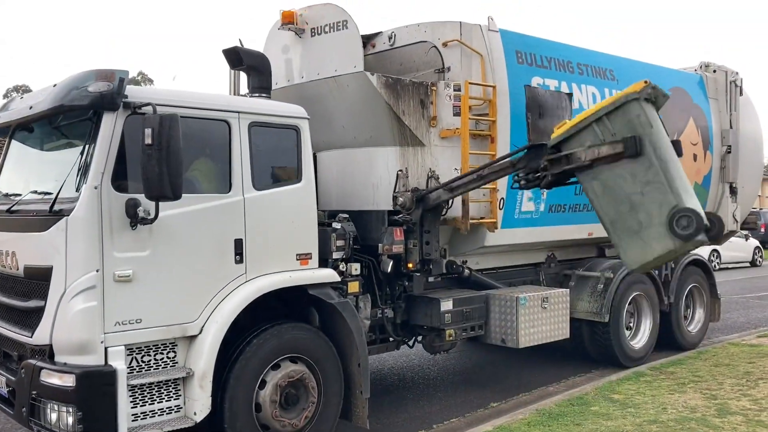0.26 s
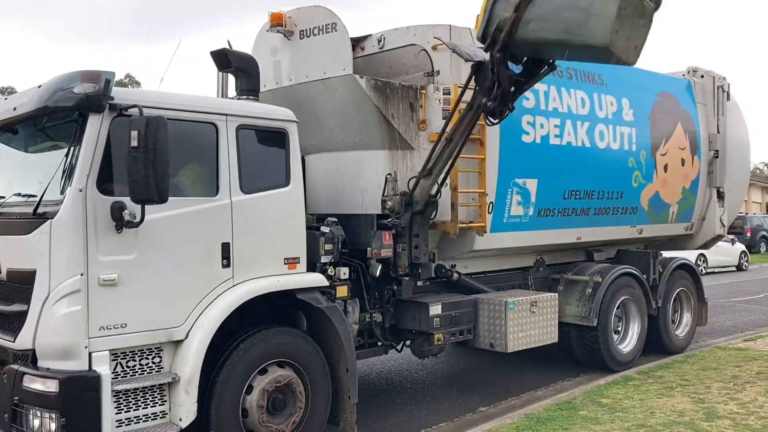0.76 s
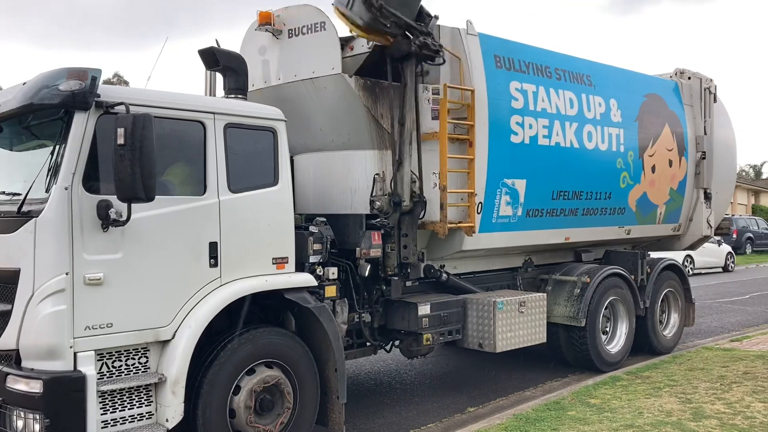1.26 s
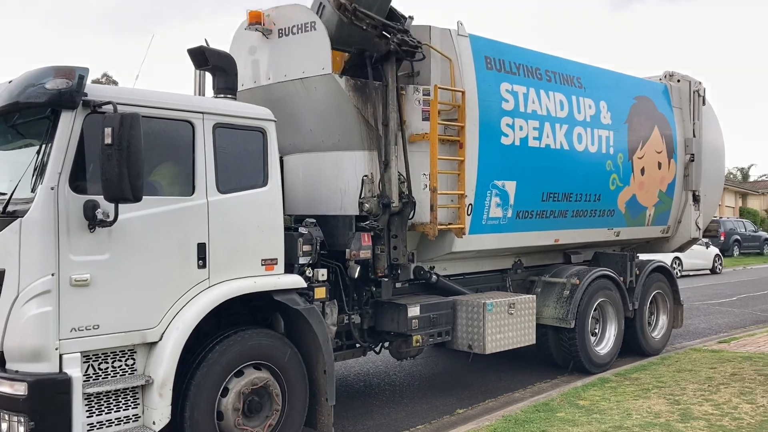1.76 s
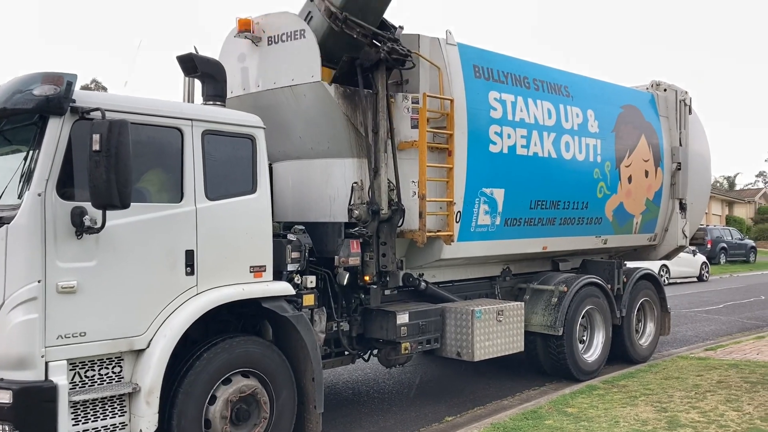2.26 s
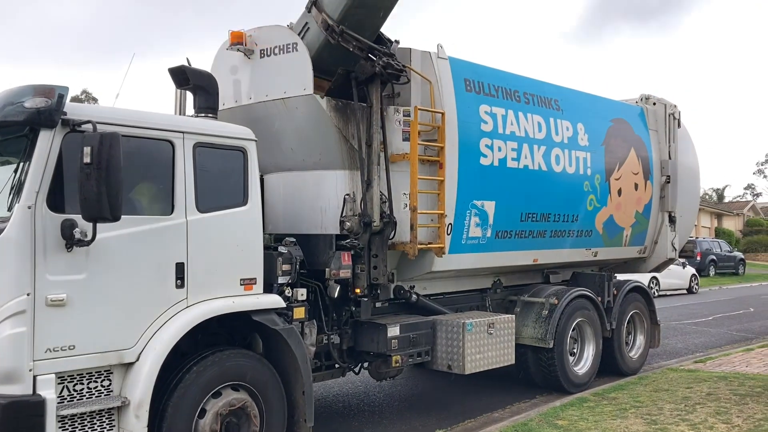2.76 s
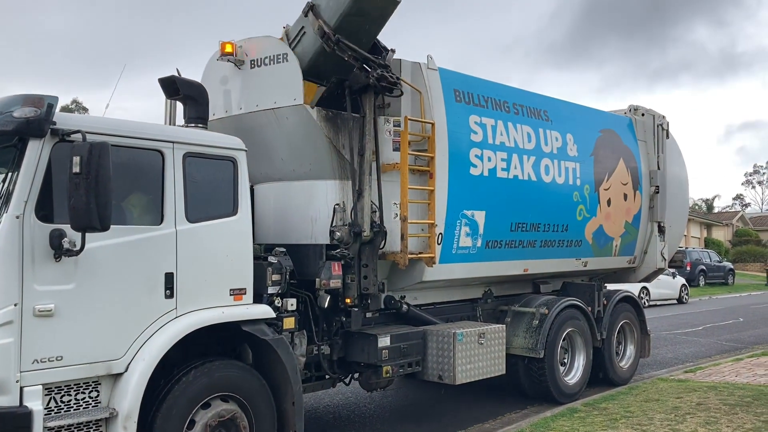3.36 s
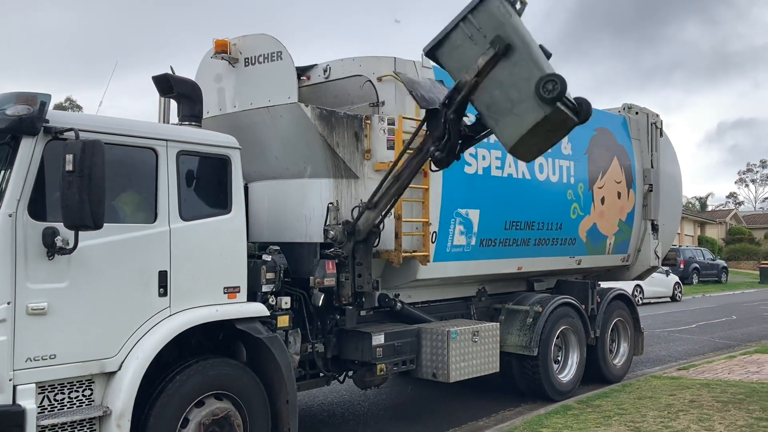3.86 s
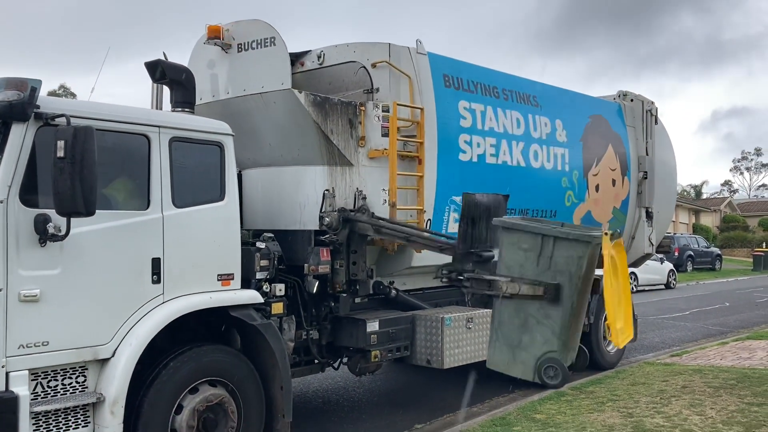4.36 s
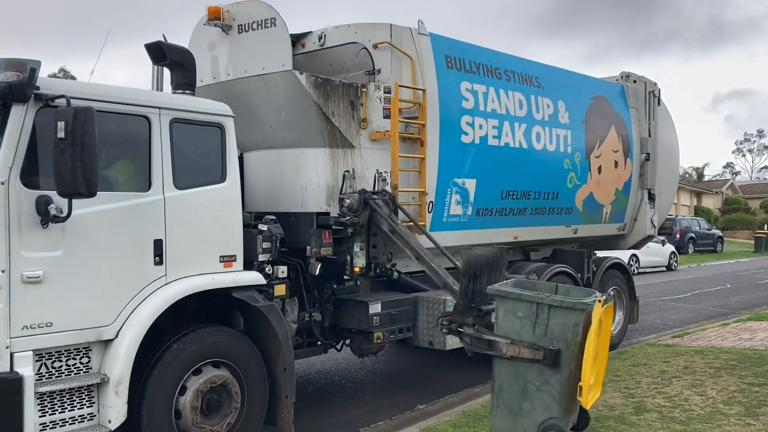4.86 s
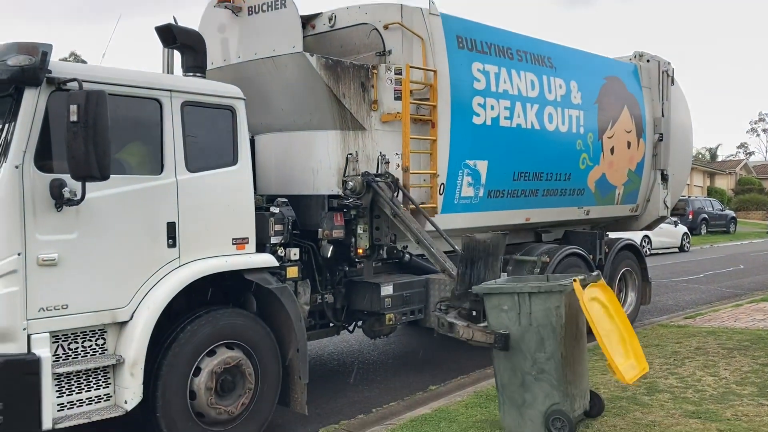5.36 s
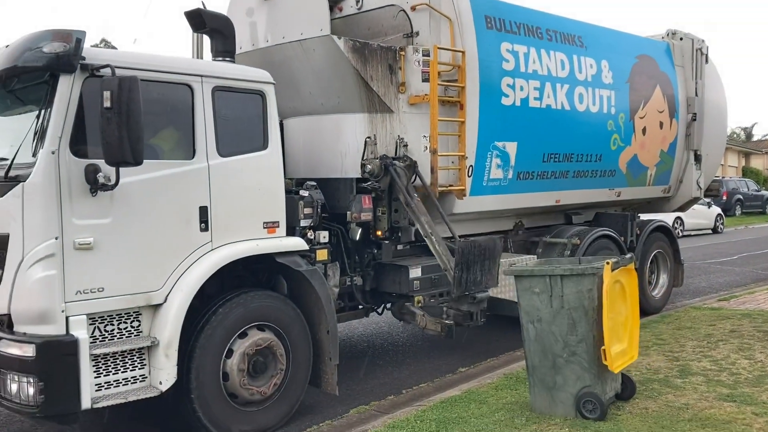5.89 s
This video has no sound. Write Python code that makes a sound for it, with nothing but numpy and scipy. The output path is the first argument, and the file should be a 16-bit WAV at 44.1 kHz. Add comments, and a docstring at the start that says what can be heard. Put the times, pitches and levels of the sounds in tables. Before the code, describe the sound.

A diesel garbage truck idles and whines as its arm tips a bin, rubbish clattering into the hopper before the bin thuds down.

```python
"""Refuse truck at the kerb

A six-cylinder diesel runs at fast idle, driving a hydraulic pump that hums and whines. The side arm
lifts a plastic bin; rubbish tumbles into the steel hopper, ringing its plates, and bottles clink. The
arm sets the bin down and folds against its stops, and the brakes vent a jet of air.
Heard from the street, a few metres off, on a hand-held phone with two microphone ports."""
import sys
import numpy as np
from scipy import signal
from scipy.fft import rfft, irfft, next_fast_len
from scipy.io import wavfile
from scipy.ndimage import uniform_filter1d

SR = 44100
rng = np.random.default_rng(int(sys.argv[2]) if len(sys.argv) > 2 else 0)


def bounce(signal):
    """Save signal as a 16-bit WAV file at the path given by the first command-line argument."""
    frames = np.transpose(np.atleast_2d(signal))
    limited = np.clip(frames, -1, 1)
    pcm = np.round(limited * 32767).astype(np.int16)
    wavfile.write(sys.argv[1], SR, pcm)


N = 270333

# modes of the steel hopper: f/Hz, level/dB, t60/s
HOPPER_MODES = [(237, 0, .15), (340, -4, .15), (650, -2, .06), (720, -3, .05), (1080, -4, .05),
                (1250, -6, .04), (1550, -5, .04), (1850, -5, .04), (2200, -8, .05), (2720, -5, .05),
                (2950, -7, .04), (3150, -6, .04), (3450, -6, .04), (3880, -8, .05), (4350, -8, .04)]
BLUNT_DB_PER_OCT, SHARP_DB_PER_OCT = 5.3, 90  # how closely a blow keeps to its pitch


def undb(db):
    """Decibels to amplitude."""
    return 10 ** (np.asarray(db) / 20)


def unit(x):
    """Scale to rms 1."""
    return x / np.sqrt(np.mean(x ** 2))


def curves(table):
    """Columns of a table joined by straight lines in time."""
    s, *columns = np.transpose(table)
    return [np.interp(np.arange(N) / SR, s, c) for c in columns]


def swell(start_s, rise_s, length_s, t60):
    """Rise, hold until length_s, then die away."""
    t = np.arange(N) / SR - start_s
    return np.clip(t / rise_s, 0, 1) * undb(-60 * np.maximum(t - length_s, 0) / t60)


def colour(x, points):
    """Filter x through (f/Hz, gain/dB) points, steeply closed beyond the ends; rms 1."""
    hz, db = np.transpose(points)
    size = next_fast_len(N)
    f = np.maximum(np.fft.rfftfreq(size, 1 / SR), 1)
    skirt_db = -24 * (np.maximum(np.log2(hz[0] / f), 0) + np.maximum(np.log2(f / hz[-1]), 0))
    gain = undb(np.interp(np.log(f), np.log(hz), db) + skirt_db)
    return unit(irfft(rfft(x, size) * gain, size)[:N])


def ring(x, hz, t60):
    """One decaying mode driven by x."""
    r, w = np.exp(-np.log(1000) / (max(t60, .005) * SR)), 2 * np.pi * hz / SR
    return signal.lfilter([0, np.sin(w)], [1, -2 * r * np.cos(w), r * r], x)


def walk(rate):
    """Random levels held 1 / rate s and slewed twice; spread near 1."""
    k = int(SR / rate)
    steps = np.repeat(rng.standard_normal(N // k + 1), k)
    return 1.3 * uniform_filter1d(uniform_filter1d(steps, k), k)[:N]


def grains(per_s, spread_db):
    """Random clicks of very unequal size."""
    hits = rng.random(N) < per_s / SR
    return hits * rng.standard_normal(N) * undb(spread_db * rng.exponential(size=N))


def tones(cycles, partials, waver_db):
    """Sines (multiple, level/dB) locked to a cycle count, wavering in level and a little in phase."""
    return sum(np.sqrt(2) * undb(db + waver_db * walk(9))
               * np.sin(2 * np.pi * k * cycles + 0.37 * np.sqrt(k) * walk(12) + k) for k, db in partials)


def blows(events, modes, rattle_s, detune, focus_db, crack_db):
    """Each blow is a short rattle that cracks and rings the modes near its pitch, never twice alike."""
    out, t = np.zeros(N + SR), np.arange(SR // 4) / SR
    for s, db, centre_hz in events:
        push = rng.standard_normal(len(t)) * np.minimum(t / (.1 * rattle_s), 1)
        push *= np.exp(-(t / rattle_s) ** 2)
        # steel walls and road throw the crack back
        tail = np.minimum(t / rattle_s, 1) * undb(-14 - 60 * t / .3) * rng.standard_normal(len(t))
        chance = rng.standard_normal((len(modes), 2)) * [3, detune]
        body = sum(undb(mode_db + chance_db - focus_db * abs(np.log2(hz / centre_hz)))
                   * ring(push, hz * (1 + shift), t60)
                   for (hz, mode_db, t60), (chance_db, shift) in zip(modes, chance))
        band = signal.butter(2, [0.46 * centre_hz, min(2.2 * centre_hz, 15500)], "band", fs=SR)
        crack = undb(crack_db) * signal.lfilter(*band, push + tail)
        out[int(s * SR):][:len(t)] += undb(db) * (1.06 * body / np.abs(body).max() + crack)
    return out[:N]


def exhaust_and_fan(firings, bass_db):
    """The exhaust's firing note and overtones, with the fan droning near three times the firing rate."""
    orders = [2, 4, 5, 6]  # exhaust overtones: multiple of the firing rate
    orders_db = [-21, -13.5, -20, -8.5]  # their level/dB re the fan
    firing_note = undb(-2.5 + bass_db) * tones(firings, [(0.99, 0)], waver_db=0.39)
    fan = tones(firings, [(2.966, 0)], waver_db=0.99)
    overtones = tones(firings, zip(orders, orders_db), waver_db=1.3)
    return firing_note + undb(0.72 * bass_db) * (fan + overtones)


def hydraulic_pump(firings, tick):
    """The engine-driven pump hums and whines louder under pressure, at each stroke of the arm."""
    # strokes: t/s, length/s, then level/dB re engine of hum, octave, third harmonic, whine
    strokes = [(-.1, 0.43, -19, -7, -21, -9), (.32, 0.92, -10.5, -14, -17.5, -8),
               (2.1, 0.64, -4, -21, -23, -10), (2.75, 0.71, -17, -15, -17.5, -9.5),
               (3.65, 1, -4, -35, -26, -17), (4.7, 0.64, -2, -16, -39, -14),
               (5.4, 0.52, -4, -32, -36, -12.5), (5.8, .4, -8.5, -27, -39, -18)]
    rest_db, pump_order = -26.5, 3.378  # pump cycles per firing
    hum, octave, third, whine = undb(rest_db) + sum(
        undb(db)[:, None] * swell(s, 0.11, length_s, t60=0.62) for s, length_s, *db in strokes)
    cycles = pump_order * firings
    pump = hum * tones(cycles, [(1, 0), (4, -17)], waver_db=1.3)
    pump += octave * tones(firings, [(2 * pump_order, 0)], waver_db=0.89)
    pump += third * tones(firings, [(3 * pump_order, 0)], waver_db=4.0)
    # hydraulic whine, thin whine of the pump drive and a ping all throb with the crankshaft
    for hz, gain, throb_db in ((1097, whine, 4), (2163, undb(-16.5), 12), (3898, undb(-19), 16)):
        throb = unit(undb(throb_db * tick + 2.5 * walk(9)))
        phase = 2 * np.pi * hz * np.cumsum(1 + .0035 * walk(15)) / SR
        pump += gain * throb * np.sqrt(2) * np.sin(phase)
    return pump


def engine_roar(firings, tick, bass_db):
    """Broad noise, rumbling below; its treble is the clatter of the block, nudged by every firing."""
    spectrum = [(40, -30), (70, -0.5), (110, -5.5), (200, -3.5), (350, -7.5), (500, -17.5), (570, -48),
                (850, -10.5), (1400, -11.5), (1800, -12.5), (3300, -16.5), (5500, -22.5), (9200, -27),
                (12000, -25), (16000, -36)]  # roar: f/Hz, density/dB
    block_modes = [(1000, 500, -10, 2), (2550, 250, -16, 10), (6900, 500, -21, 5), (660, 60, -14, 1),
                   (1060, 160, -8, 3), (2162, 45, -14, 7), (4300, 300, -17.5, 10), (4850, 200, -23, 10)]  # engine block: f/Hz, width/Hz, level/dB re roar, swell on the tick/dB
    nudge = undb(.8 * np.cos(2 * np.pi * firings) + 1.2 * walk(12))
    noise = colour(rng.standard_normal(N), spectrum)
    rumble, low = (signal.sosfiltfilt(signal.butter(2, edge_hz, fs=SR, output="sos"), noise)
                   for edge_hz in (130, 1800))
    middle = (low - rumble) * undb(1.03 * walk(12))
    clatter = (noise - low) * unit(undb(3.5 * tick)) * nudge
    roar = undb(3 + bass_db) * rumble + middle + clatter
    for hz, width_hz, db, swell_db in block_modes:
        drive = rng.standard_normal(N) * undb(swell_db * tick) * nudge
        roar += undb(db) * unit(ring(drive, hz, t60=np.log(1000) / np.pi / width_hz))
    return roar


def diesel():
    """Exhaust, fan, pump and block keep time with one crankshaft, three firings to the turn."""
    # the engine's sound drops back after the rubbish crashes down, and its bass returns slowly: t/s, level/dB,
    # bass/dB re level
    loudness = [(0, -25, 1.5), (.3, -22.5, -2.5), (1.4, -22.5, 0), (1.6, -26.5, -2.5), (1.75, -24, -7),
                (1.9, -30, -22), (2.3, -30, -10), (2.7, -34.5, -0.5), (3.2, -32, 1), (3.6, -31, -1.5),
                (4.2, -31, 1), (5.0, -31.5, 1), (5.6, -30.5, 0.5), (6.13, -28, -3)]
    firing_rate = [(0, 45.6), (.45, 46.4), (.75, 46.9), (1.35, 47.55), (1.8, 47.7), (2.55, 47.2),
                   (3.15, 46.95), (3.5, 46.2), (3.63, 48.35), (4.05, 47.85), (4.95, 47.4), (5.1, 48),
                   (5.5, 47.45), (6.13, 47.6)]  # fast idle: t/s, f/Hz
    level_db, bass_db = curves(loudness)
    firings = np.cumsum(curves(firing_rate)[0]) / SR
    # one knock a turn stands out and dies away before the next; one of them starts at tick_s
    tick_s = 3.808
    turn = (firings - firings[int(tick_s * SR)]) / 3 % 1
    tick = np.minimum(turn / .14, 1) * np.exp(-(turn / .4) ** 2)
    tonal = exhaust_and_fan(firings, bass_db) + hydraulic_pump(firings, tick)
    return undb(level_db) * (tonal + engine_roar(firings, tick, bass_db))


def bin_thuds():
    """Soft blows of arm and bin: a low damped swing that takes half a cycle to build."""
    thuds = [(.288, -12, 58, 0.17), (.375, -13.5, 206, 0.13), (.655, -12, 56, 0.31),
             (1.455, -11, 238, 0.21), (1.698, -22, 203, .1), (2.426, -27.5, 335.3, 0.5),
             (3.448, -18, 78, 0.24), (3.551, -8.5, 114, 0.054), (4.465, -10.5, 150, 0.11),
             (4.52, -16.5, 82, 0.19), (5.16, -16.5, 205, 0.098), (5.176, -10, 103.5, 0.15),
             (5.21, -10.5, 97, 0.12)]  # dull blows: t/s, level/dB, f/Hz, t60/s
    out, t = np.zeros(N + SR), np.arange(SR // 2) / SR
    for s, db, hz, t60 in thuds:
        envelope = undb(db - 60 * t / t60) * np.minimum(2 * hz * t, 1)
        out[int(s * SR):][:len(t)] -= envelope * np.sin(2 * np.pi * hz * t)
    return out[:N]


def sliding_rubbish(glass_modes):
    """A dense patter of paper, cans and plastic: grains over a scrape, ringing the hopper plates."""
    # sliding heaps: t/s, length/s, level/dB, then hopper boom/dB, rustle/dB, clinks/dB re that level
    heaps = [(1.345, 0.05, -22, 1.5, -2.5, -1), (1.405, 0.067, -16.5, -0.5, -8.5, -3),
             (1.489, 0.08, -29.5, 6, -1, 6.5), (1.65, 0.061, -17.5, -5, -17, -22),
             (1.698, 0.056, -15, -2.5, -11, -3.5), (1.779, 0.061, -15.5, -23, -6.5, -4),
             (1.883, 0.038, -22, -8.5, -8.5, -7), (1.962, 0.032, -26.5, -2.5, -30, -18),
             (2.023, 0.064, -24.5, -15, -8.5, -2.5), (2.125, 0.018, -36, -3, -2, 9.5),
             (2.21, 0.064, -29, -11, -10.5, -3), (2.295, 0.02, -26.5, -3, -9, -4),
             (2.358, 0.015, -25, -24, -18, -4), (2.415, 0.034, -26.5, -7, -12, -12),
             (2.517, 0.11, -35, 0, -11, -7)]
    slide_spectrum = [(400, -66), (700, 6), (1100, 6.5), (2200, 5.5), (2700, 0.5), (3400, -29), (4600, -14),
                      (5500, -67)]  # scrape: f/Hz, density/dB
    flow, boom_gain, rustle_gain, clink_gain = sum(
        undb(db + np.array([0, *re_db]))[:, None] * swell(s, .004, length_s, t60=.15)
        for s, length_s, db, *re_db in heaps)
    patter = unit(grains(900, 2.2)) + .6 * rng.standard_normal(N)
    plates = sum(undb(db + 6 * walk(25)) * unit(ring(patter, hz, .4 * t60))
                 for hz, db, t60 in HOPPER_MODES[2:9])
    # small hard pieces briefly find the high modes
    clinks = sum(undb(db) * unit(ring(grains(250, 1.8), hz, .35 * t60))
                 for hz, db, t60 in HOPPER_MODES[9:])
    tumble = unit(grains(200, 1.2)) + .8 * rng.standard_normal(N)
    boom = colour(tumble, [(120, -1.0), (230, 3.0), (340, -2.5), (450, -4.5)])
    hiss = undb(2.5 * walk(40)) * rng.standard_normal(N)
    crackle = 0.27 * patter + 0.22 * unit(grains(150, 2)) + hiss
    rustle = colour(crackle, [(5000, 7.5), (7000, 9.5), (9500, 5.5), (12000, 3.0), (16000, -6)])
    tinkle = sum(undb(db) * unit(ring(grains(90, 1.5), hz, t60)) for hz, db, t60 in glass_modes)
    rustle += undb(-9.5) * unit(tinkle)
    slide = colour(patter, slide_spectrum) + 0.65 * unit(plates)
    return flow * slide + clink_gain * unit(clinks) + boom_gain * boom + rustle_gain * rustle


def hopper_clinks():
    """Cans and bottles each find one high mode of the hopper."""
    clinks = [(1.353, -11.5, 3890), (1.417, -9, 2700), (1.5, -11, 3150), (1.525, -4.5, 2900),
              (1.575, -16.5, 2200), (1.735, -20, 4350), (1.992, -11.5, 2750), (2.065, -19, 2720),
              (2.305, -27, 4350), (2.418, -16, 3000)]  # sharp hits: t/s, level/dB, near f/Hz
    return blows(clinks, HOPPER_MODES, .008, detune=0.0036, focus_db=SHARP_DB_PER_OCT, crack_db=-7.5)


def bottle_clinks(glass_modes):
    """Bottles strike one another and ring high."""
    clinks = [(1.385, -15, 6950), (1.39, -22, 11750), (1.465, -19, 10050), (1.52, -23, 11750),
              (1.783, -16, 6950), (1.815, -15, 7400), (2.028, -27, 7400), (2.238, -28, 7400),
              (2.4, -24, 6950), (2.415, -26, 10050), (2.503, -30.5, 7400), (2.52, -32, 11750)]  # glass on glass: t/s, level/dB, near f/Hz
    return blows(clinks, glass_modes, .014, detune=0.0116, focus_db=SHARP_DB_PER_OCT / 2, crack_db=-4.5)


def hopper_knocks():
    """Blunt pieces strike the hopper and ring many of its modes at once."""
    knocks = [(1.39, -5.5, 1485), (1.464, -20, 1110), (1.531, -19, 3170), (1.654, -17, 1600),
              (1.7, -6.5, 3700), (1.781, -3, 1040), (1.819, -17, 1148), (1.889, -9.5, 1530),
              (1.992, -16.5, 9500), (2.028, -18, 1080), (2.082, -22, 1100), (2.127, -17, 1090),
              (2.211, -19.5, 1290), (2.298, -26, 1800), (2.358, -16.5, 2000), (2.418, -11, 1110)]  # hits on steel: t/s, level/dB, strongest near f/Hz
    return blows(knocks, HOPPER_MODES, .008, detune=0.025, focus_db=BLUNT_DB_PER_OCT, crack_db=2.0)


def arm_stops():
    """The arm knocks against its stops and rings briefly."""
    arm_modes = [(980, -2, .03), (1150, 1, .04), (1650, -5, .04), (1900, -5, .03), (2200, -3, .025),
                 (2750, -4, .025), (3300, -4, .025), (4050, -3, .02), (4400, -4, .02)]  # side arm: f/Hz, level/dB, t60/s
    stops = [(2.826, -21, 2600, .01), (4.4565, -14, 1300, .003), (4.4598, -21, 7000, .002),
             (5.8795, -7, 1250, .012)]  # knocks: t/s, level/dB, strongest near f/Hz, rattle/s
    return sum(blows([stop], arm_modes, rattle_s, detune=0.012, focus_db=BLUNT_DB_PER_OCT, crack_db=-4)
               for *stop, rattle_s in stops)


def brake_air():
    """The brakes vent a bright, fluttering jet of air."""
    spectrum = [(3000, -10), (6000, -4), (8000, -9.5), (10800, 2.5), (13000, -6), (16000, -0.5)]  # air jet: f/Hz, density/dB
    envelope = swell(start_s=5.625, rise_s=0.016, length_s=0.13, t60=1.17)
    return envelope * undb(-26 + walk(21)) * colour(rng.standard_normal(N), spectrum)


def right_port(left):
    """The far port hears the truck round the phone, mixed with scatter from road and cab."""
    response = [(0, 0, 0, .99), (170, .8, 0, .995), (300, 3.5, -.25, .96), (430, 5.5, -1, .8),
                (560, 1, -2.8, .65), (700, -5, -1.4, .6), (775, -7.5, -3.2, .55), (1000, -5.5, -6.3, .9),
                (1300, -6, -7.1, .85), (1700, -6, -9, .65), (2200, -6, -10.2, .55), (3000, -3.5, -9.2, .6),
                (3900, -3, -7.6, .6), (5500, -1, -9.4, .6), (7000, 0, -6.3, .93), (22050, 0, 15.2, .7)]  # right port re left: f/Hz, gain/dB, phase/rad, direct share (0-1)
    scatter_t60_s, drift_rad = 0.19, 2.5
    size = next_fast_len(N)
    scatter = rfft(rng.standard_normal(N) * undb(-60 * np.arange(N) / SR / scatter_t60_s), size)
    hz, *columns = np.transpose(response)
    gain_db, phase, direct = (np.interp(np.fft.rfftfreq(size, 1 / SR), hz, c) for c in columns)
    heard = rfft(left, size) * undb(gain_db)
    straight = irfft(heard * direct * np.exp(1j * phase), size)[:N]
    stray = heard * np.sqrt(1 - direct ** 2) * scatter / np.abs(scatter)
    in_phase, quadrature = (irfft(path, size)[:N] for path in (stray, 1j * stray))
    drift = drift_rad * walk(5)  # the phone is hand-held, so the scattered paths keep shifting
    return straight + np.cos(drift) * in_phase + np.sin(drift) * quadrature


def scene():
    """The truck from a few metres off, with the left port facing it."""
    glass_modes = [(6500, -2, .05), (6950, 0, .06), (7400, -1, .06), (10050, -3, .05), (11750, -4, .05)]  # bottles and tins: f/Hz, level/dB, t60/s
    left = diesel() + sliding_rubbish(glass_modes) + hopper_knocks() + bin_thuds() + brake_air()
    left += hopper_clinks() + bottle_clinks(glass_modes) + arm_stops()
    return np.array([left, right_port(left)])


def record(dry):
    """The phone rounds the loudest peaks and cuts the top."""
    top_hz = 15650
    rounded = np.tanh(1.1 * dry) / 1.1
    return signal.sosfilt(signal.ellip(10, .2, 70, top_hz, fs=SR, output="sos"), rounded)


dry = scene()
out = record(dry)
bounce(out)
```